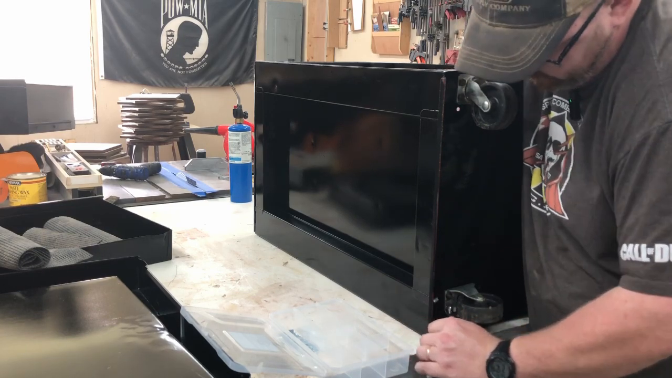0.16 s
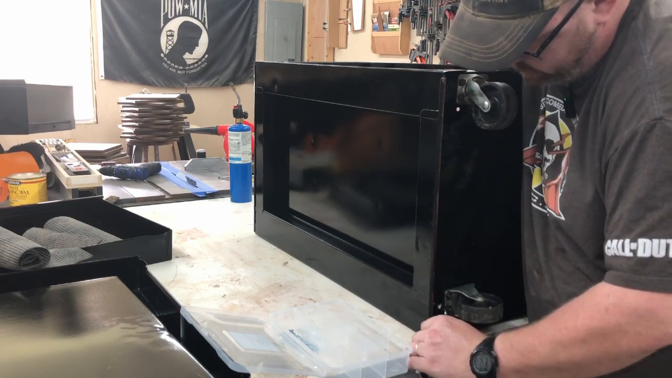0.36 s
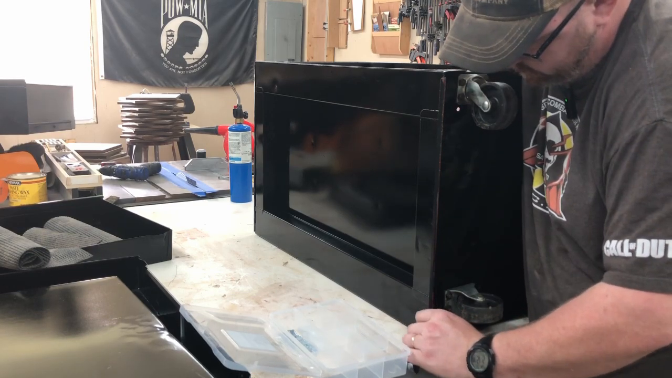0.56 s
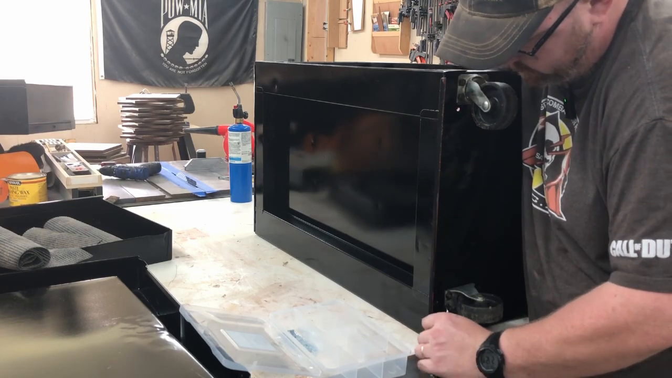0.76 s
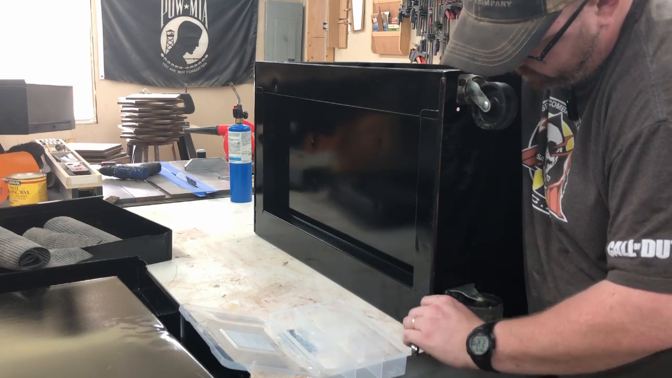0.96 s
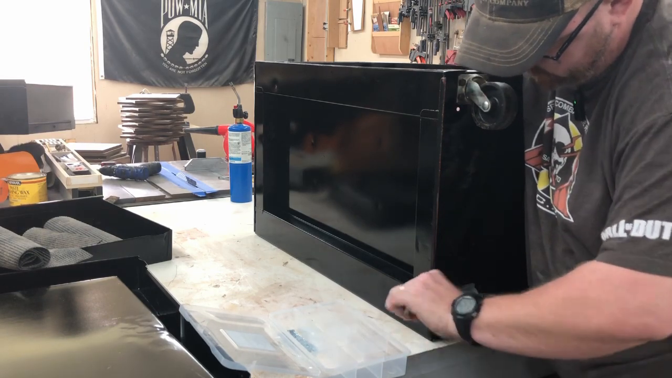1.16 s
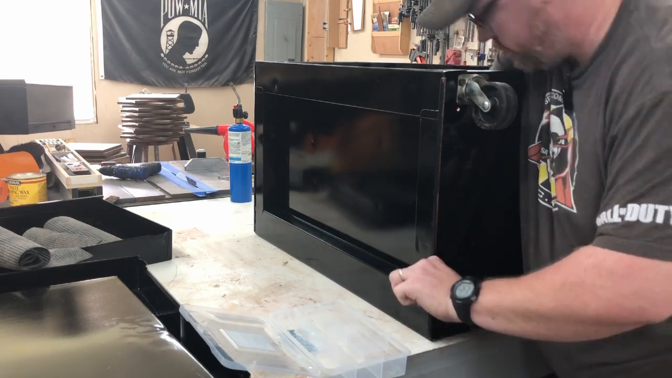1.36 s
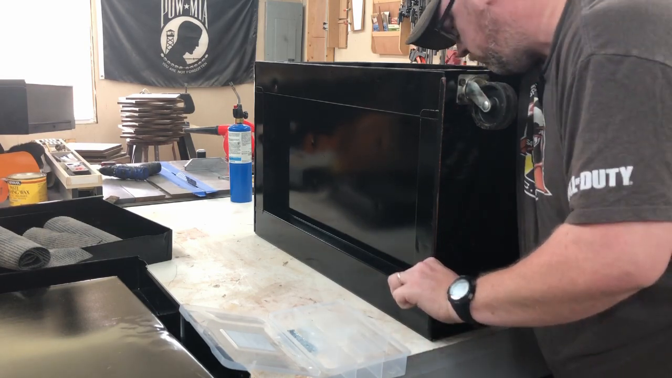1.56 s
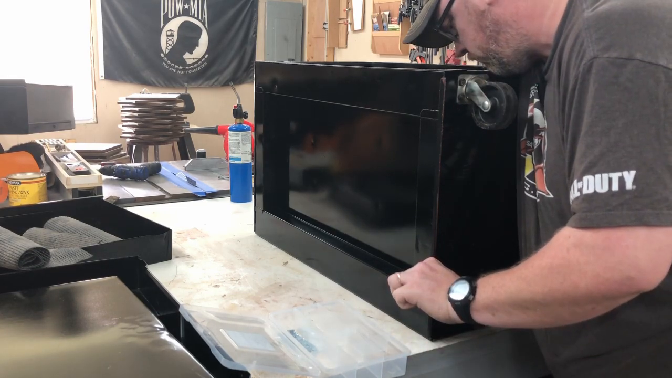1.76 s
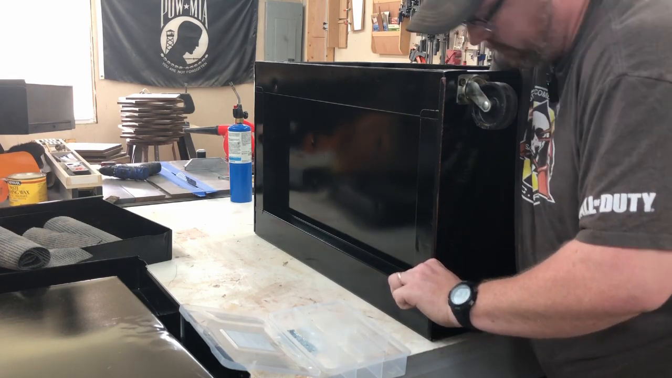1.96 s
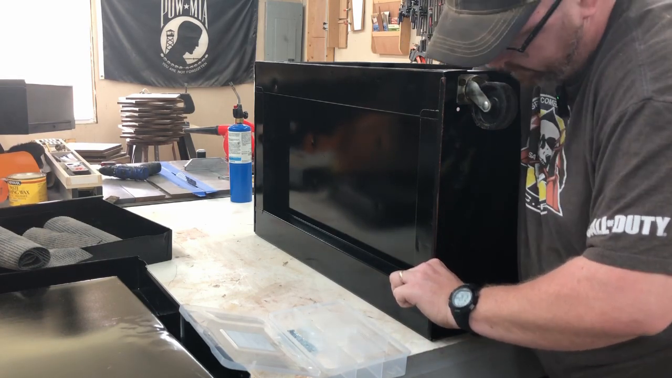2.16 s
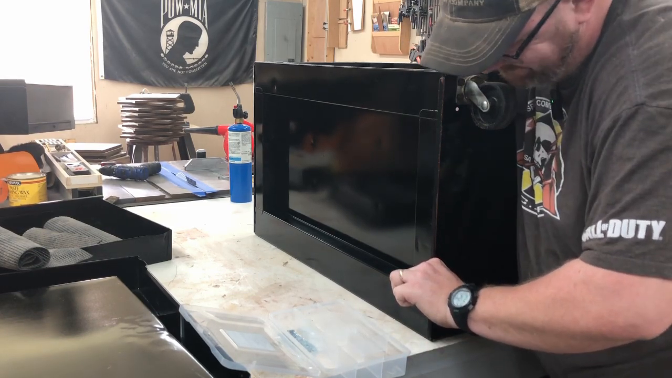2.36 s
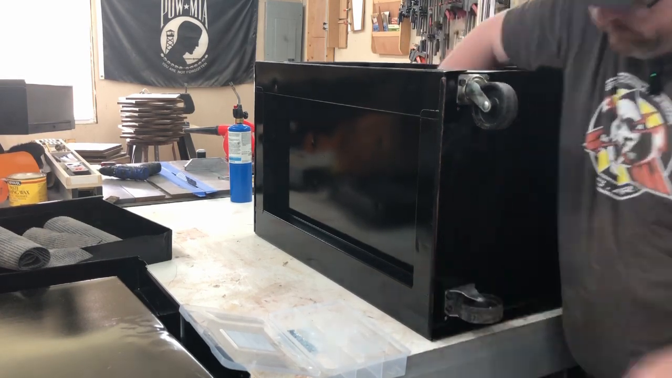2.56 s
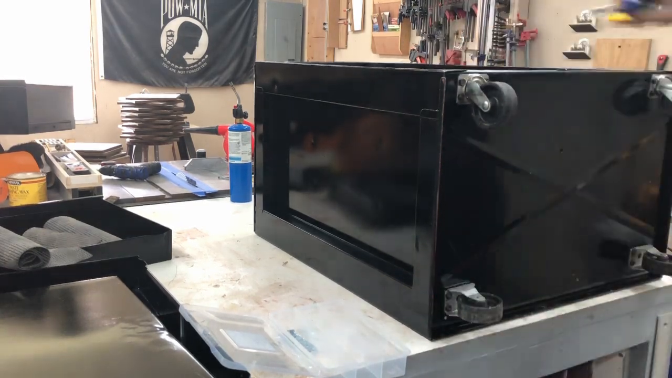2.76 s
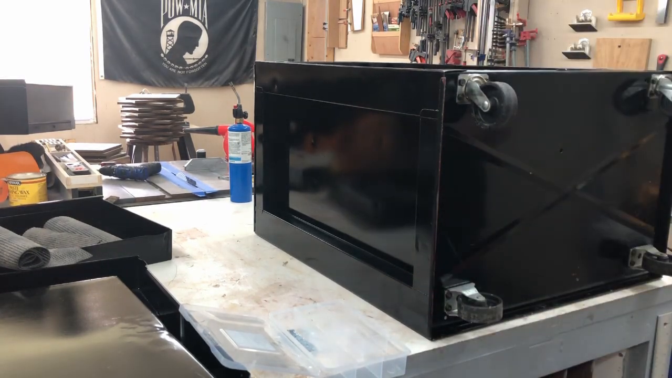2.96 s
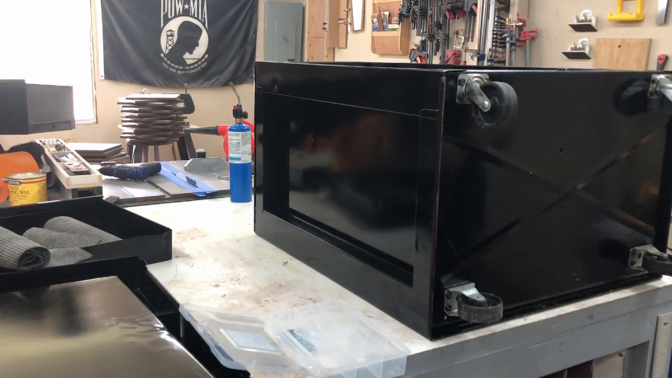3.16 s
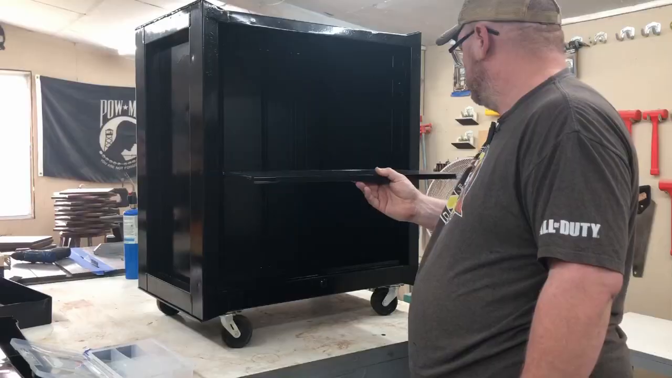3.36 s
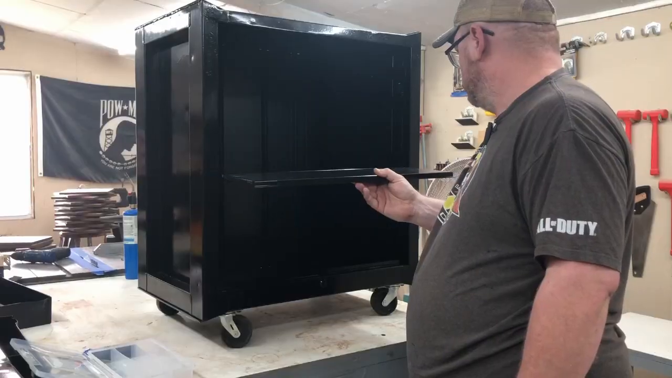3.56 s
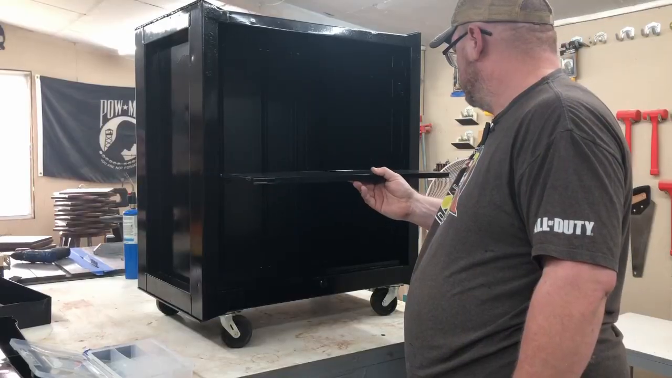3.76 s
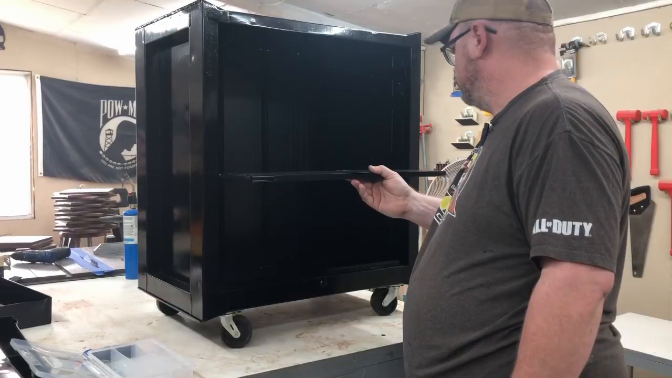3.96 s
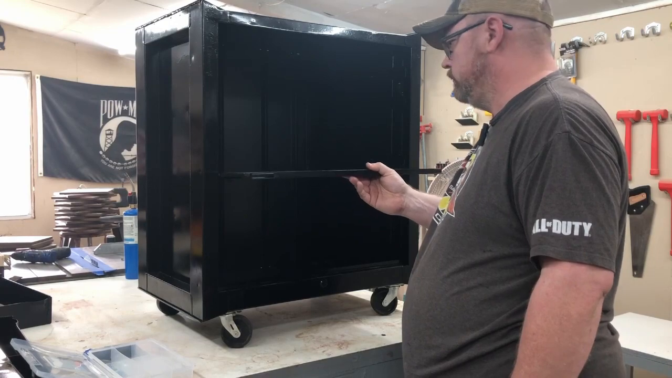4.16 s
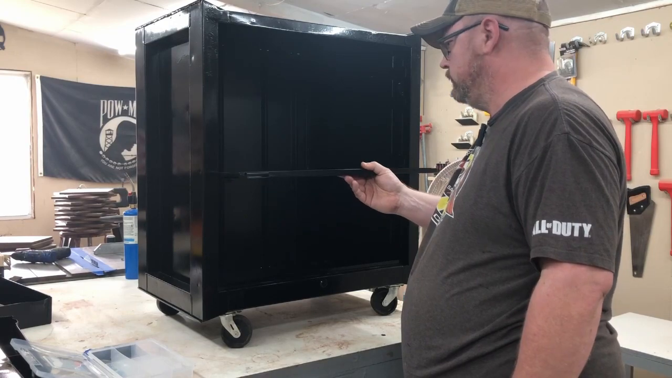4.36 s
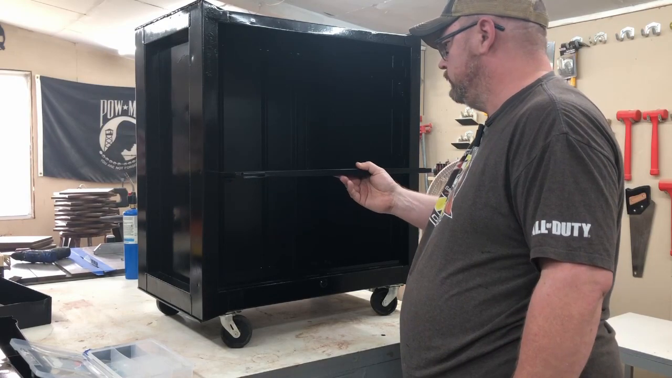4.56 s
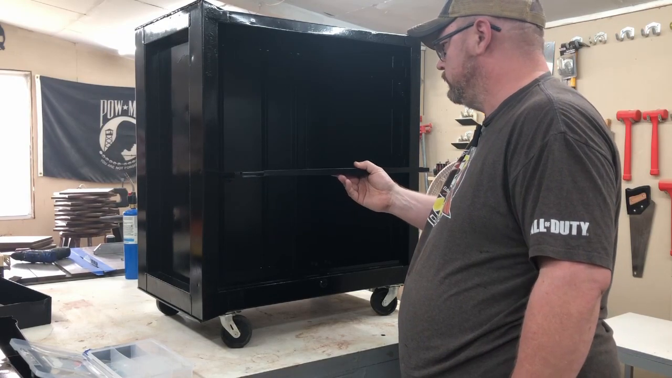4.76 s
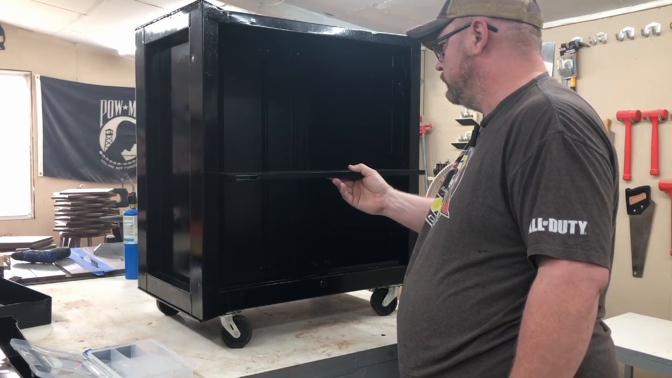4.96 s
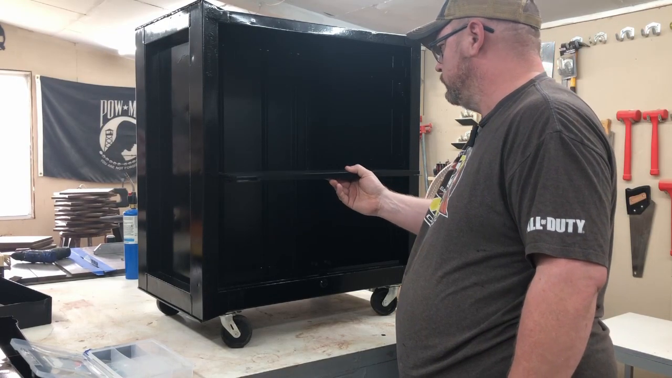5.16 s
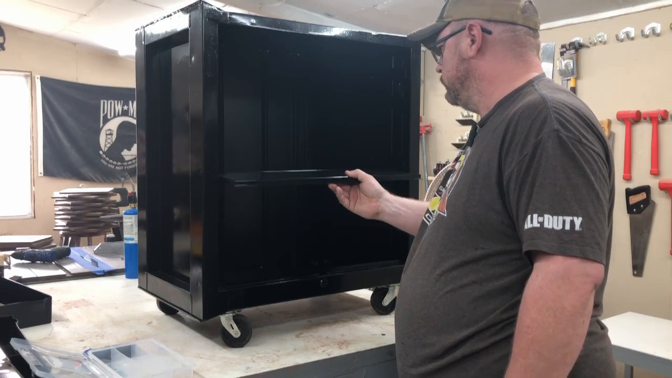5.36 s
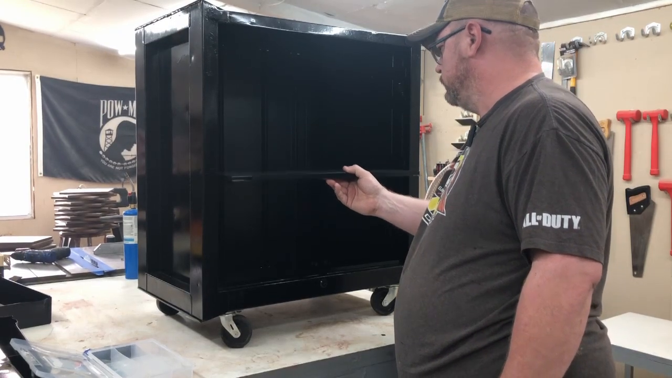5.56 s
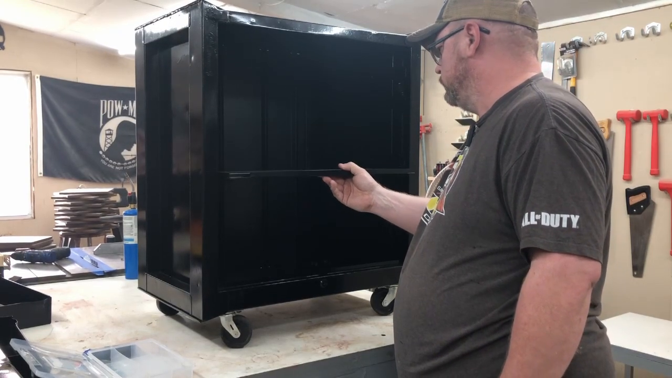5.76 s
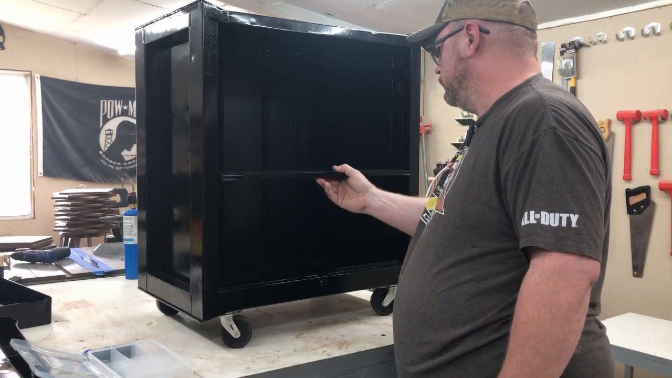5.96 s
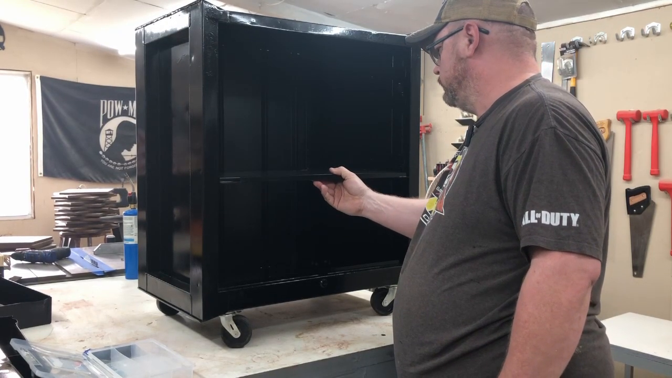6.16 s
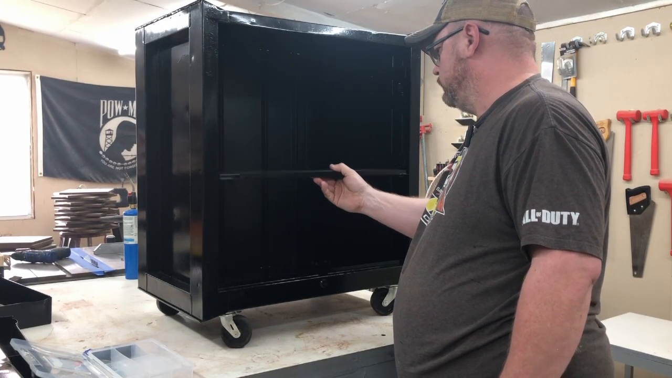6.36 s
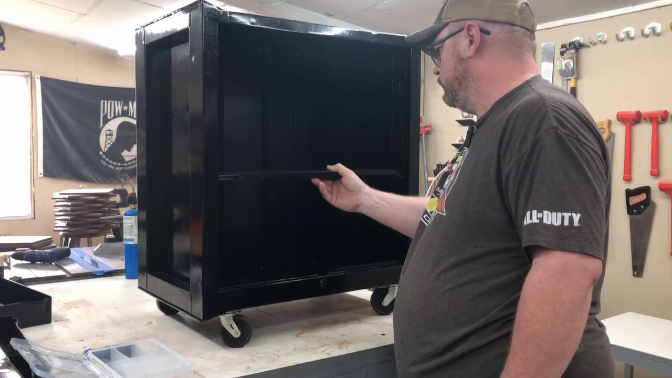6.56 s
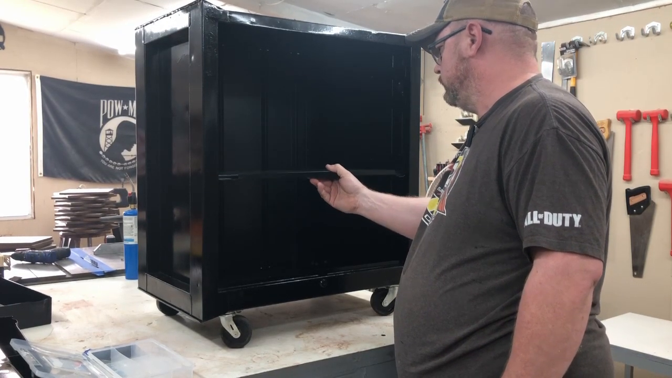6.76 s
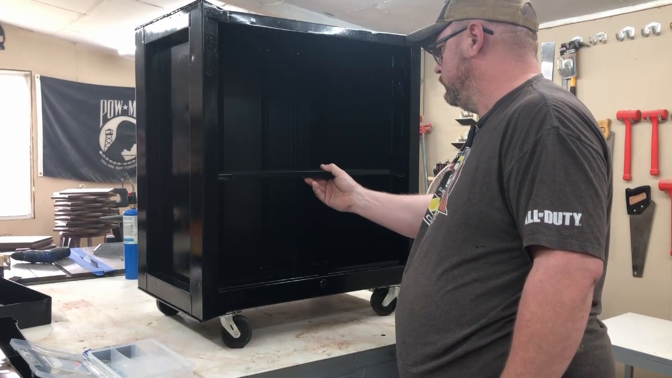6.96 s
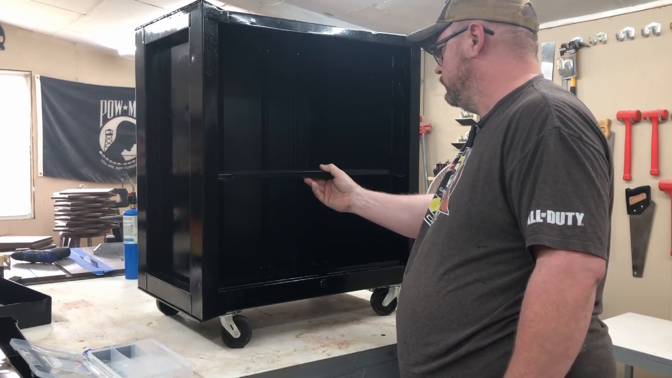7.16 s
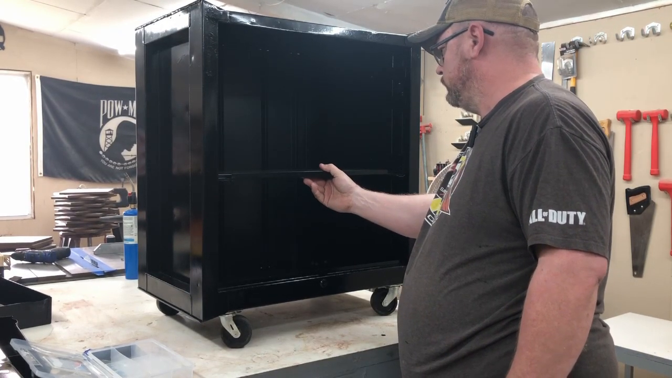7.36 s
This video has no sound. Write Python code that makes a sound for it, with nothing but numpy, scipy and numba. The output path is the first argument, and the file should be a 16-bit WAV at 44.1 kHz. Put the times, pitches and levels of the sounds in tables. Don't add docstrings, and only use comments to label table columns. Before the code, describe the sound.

Rapid bright steel ticks and taps, a tiny gap, then slower hollow bangs and a brief scrape as a metal shelf is pushed into a cabinet.

```python
import sys
import numpy as np
from scipy import signal
from scipy.fft import rfft, irfft
from scipy.io import wavfile
from scipy.ndimage import uniform_filter1d
from numba import njit

SR = 44100
rng = np.random.default_rng(int(sys.argv[2]) if len(sys.argv) > 2 else 0)


def digitize_waveform(pressure):
    field = np.atleast_2d(pressure).T
    bounded = np.clip(field, -1, 1)
    quanta = np.round(bounded * 32767).astype(np.int16)
    wavfile.write(sys.argv[1], SR, quanta)


def level_to_linear(level):
    exponent = np.asarray(level, float) / 20
    return 10 ** exponent


N = 326340
BASS_CUT_HZ = 220.5

# (frequency [Hz], level [dB])
GATE = [(300, -72.5), (1500, -76), (4000, -95.5), (12000, -109.5)]


def spanner():
    speed_up, ring_factor = 4.0, 0.6
    # (time [s], tool ring [dB], socket knock [dB], edge tick [dB])
    ticks = [(.417, -19, -32, -28), (.4369, -25.5, -45, -33), (.5287, -28, -28, -20),
             (.5347, -27, -32, -34), (.6141, -36, -34, -38.5), (.6385, -34, -34, -19),
             (.6856, -50, -53, -48.5), (.7438, -20.5, -26, -36), (.751, -23, -33, -21),
             (.7728, -38, -30, -28), (.7965, -29, -38, -28), (.8263, -45, -76, -43.5),
             (.878, -25, -36, -24), (.9117, -31, -31, -20), (.9175, -23, -30, -24), (.9478, -26, -38, -22),
             (.9663, -38, -54.5, -41.5), (.9697, -22.5, -28, -22.5), (.9868, -30, -34, -30)]
    # (time [s], tool ring [dB], socket knock [dB], edge tick [dB], contact if brief [ms])
    taps = [(0.078, -59, -50.5, -45), (0.1147, -80, -49.5, -50.5), (.1344, -82, -52, -32.5),
            (.209, -75, -48.5, -42), (.2874, -60, -77, -54), (.3007, -52, -60, -54),
            (0.319, -35.5, -77, -85), (0.3482, -55.5, -51.5, -41), (1.1473, -28, -30.5, -26.5),
            (1.247, -54, -66, -53), (1.283, -27, -29.5, -27), (1.3396, -45, -60, -47.5),
            (1.7139, -42, -46, -30, .15), (1.7204, -47, -48, -31, .15), (1.949, -55, -60, -50, .15),
            (2.1473, -33, -39, -37), (2.5266, -75, -78, -46)]
    # (time [s], tool ring [dB], socket knock [dB], edge tick [dB], contact [ms])
    slips = [
        (.517, -25, -37, -28, 4),
        (.524, -24, -34, -30, 2),
        (.619, -19, -26, -24, 3),
        (.734, -26, -26, -31, 2.5),
        (.762, -22, -29, -22, 3),
        (.865, -27, -33, -37, 4),
        (.874, -16, -27, -30, 1.5),
        (1.278, -45, -45, -50, 2),
        (.546, -38, -29, -45, 2),
        (.925, -34, -32, -36, 3),
    ]
    # (frequency [Hz], level per Hz [dB])
    tool_spectrum = [(290, -51), (500, -16), (952, -27), (1100, -11), (1410, -4), (2000, -8), (2600, -14),
                     (3700, -16), (4110, 1.5), (4900, 0), (6470, -11.5), (9060, -10), (12300, -21),
                     (14900, -24), (16500, -60)]
    # (frequency [Hz], level [dB], t60 [s])
    tool_modes = [(1440, -5, .07), (1800, -6, .05), (4250, 4, .06), (4530, 1, .06), (4850, 4, .05),
                  (6080, -6, .05), (7450, -9, .05), (9150, -12, .04)]
    # (time [s], tool ring [dB], wall knock [dB], edge tick [dB], contact if given [ms])
    clacks = [(1.0318, -32.5, -36, -55), (1.0347, -5.5, -24, -27, .33), (1.0448, -23.5, -53, -27.5),
              (1.56, -17, -13, -43), (1.666, -111, -26, -83, 1.5), (1.7931, -20.5, -20, -26),
              (1.8159, -21, -42, -35), (1.8217, -17, -23, -33), (1.8973, -22, -14.5, -26),
              (1.9981, -13, -15.5, -29, .33), (2.2352, -52, -53, -77), (2.4686, -47.5, -26.5, -53),
              (2.4872, -53, -32, -67), (2.7864, -50.5, -51, -55)]
    # (frequency [Hz], level per Hz [dB])
    wall_spectrum = [(290, -63), (500, -2), (764, -24), (1070, -1.5), (2040, 4.5), (2260, -6),
                     (3300, -11.5), (3600, -14), (4110, -10), (7380, -24), (15100, -22.5), (16500, -44)]
    # (frequency [Hz], level [dB], t60 [s])
    wall_modes = [(1082.5, 16, 0.13), (1336, 4, 0.1), (2070, 2, .05), (2380, 0, .04), (3040, -6, .06),
                  (3330, -2, .04), (4030, -3, .04), (4580, -7, .04)]
    tool = steel(sorted(ticks + taps + slips), tool_spectrum, tool_modes, speed_up, ring_factor, thud_db=-4.5)
    wall = steel(clacks, wall_spectrum, wall_modes, speed_up, ring_factor, thud_db=3)
    return tool + wall


def steel(blows, spectrum, named, speed, ring_factor, thud_db):
    # (frequency [Hz], t60 [s])
    steel_t60 = [(700, 0.28), (1850, 0.09), (4880, 0.073), (12900, 0.068)]
    usual_ms, usual_crack_db, crack_loss_db = 0.4, -16, 7
    glance = 0.067
    out, thud = np.zeros(N), np.zeros(N)
    hz, db, t60 = body(spectrum, named, steel_t60, 17, [], count=420)
    gate = level_to_linear(along(GATE, hz / speed) - 16.5)
    crack_t60 = np.full(len(hz), 0.008)
    in_step = np.pi / 2 - 2 * np.pi * hz * 0.001
    for s, mid_db, low_db, high_db, *contact in blows:
        ms = max(contact[0], 0.1) if contact else usual_ms
        crack_change_db = -crack_loss_db * np.log2(ms / usual_ms)
        crack_db = usual_crack_db + crack_change_db
        blow_db = max(mid_db, low_db)
        length = ring_factor * level_to_linear(glance * np.clip(-23.5 - blow_db, 0, 15))
        bands_db = np.array([low_db, mid_db, high_db])
        size = struck(hz, db, [900, 2500, 7000, 16000], bands_db, 3.3, 6.5, 4500)
        start, phase = int(s * SR), 2 * np.pi * rng.random(len(hz))
        ring_modes(out, start, hz, size * level_to_linear(-13.5), t60 * length, phase, ms / 1000, gate)
        ring_modes(out, start, hz, size * level_to_linear(crack_db), crack_t60, in_step, 0.0003, gate / 30)
        thud_size = level_to_linear(min(high_db, blow_db + 8) + thud_db + min(crack_change_db, 0))
        thud[start + SR // 1000] += thud_size * np.sign(phase[0] - np.pi)
    return bass_cut(out, BASS_CUT_HZ * speed) + soft_click(thud)


def splice_clicks():
    # (time [s], level [dB])
    splices = [(.418, -29), (.531, -20), (0.6394, -20), (.6866, -27.5), (0.7463, -10.5), (0.754, -16),
               (.7982, -10.5), (.878, -12.5), (0.9112, -13), (0.9158, -18.5), (0.97, -19), (1.1482, -11.5),
               (1.715, -18), (2.1485, -28)]
    joins = np.zeros(N)
    for s, db in splices:
        joins[int(s * SR)] = level_to_linear(db)
    return soft_click(joins)


def shelf():
    # (time [s], floor boom [dB], panel ring [dB], rail clank [dB], contact rise [ms])
    nudges = [(3.541, -41, -26.5, -34, 1.6), (3.551, -32.5, -40, -30, 5), (3.619, -30, -38, -37.5, 0.84),
              (3.781, -31.5, -30.5, -43, 3.7), (3.923, -51, -59, -70, 3.5), (4.701, -36.5, -51.5, -70, 7.5),
              (4.738, -29.5, -26, -39, 9.4), (4.797, -23.5, -40, -83.5, 2.2), (4.867, -36.5, -75, -74, 1.6),
              (5.13, -29.5, -59, -65, 0.68), (5.213, -51, -50.5, -44.5, 2.1),
              (5.261, -29.5, -50.5, -46.5, 3.7), (5.337, -47.5, -51, -40.5, 3.8),
              (5.853, -21, -53, -55, 0.63), (7.052, -27.5, -51, -43, 4.2), (7.066, -37, -52, -36, 3.6),
              (7.108, -39, -79, -39, 3.6)]
    # (time [s], floor boom [dB], panel ring [dB], rail clank [dB], contact rise [ms])
    bangs = [(5.392, -25.5, -38, -10, 7.1), (5.404, -16.5, -26.5, -18, 8.8), (5.406, -40, -25, -15.5, 3.6),
             (5.446, -26.5, -28, -20, 10.5), (5.493, -22, -40.5, -22.5, 2.7), (6.154, -39.5, -52, -62, 3.4),
             (6.174, -29.5, -44, -37.5, 9.1), (6.2, -39, -45.5, -37, 2.2), (6.22, -21, -28.5, -14.5, 2.9),
             (6.242, -51, -27.5, -16, 4), (6.266, -23, -27, -19, 0.98), (6.309, -30, -34, -49, 3.3),
             (6.535, -37, -37, -31, 9), (6.551, -27.5, -26.5, -13.5, 4), (6.578, -27, -29, -19, 3),
             (6.701, -16, -27, -18, 2.9), (6.719, -24, -35, -42, 3.7), (6.759, -28.5, -32, -62, 2.7)]
    # (time [s], level [dB])
    scrapes = [
        (4.799, -61),
        (5.337, -45.5),
        (5.403, -22),
        (7.062, -51.5),
        (7.106, -50),
    ]
    # (frequency [Hz], level per Hz [dB])
    panel_spectrum = [(59, -71), (100, 1), (156, -20), (266, -12), (406, -12.5), (442, -4.5), (547, -4),
                      (836, -3.5), (1870, -27.5), (2040, -34.5), (3250, -29.5), (4570, -33), (8280, -29.5),
                      (12900, -32), (16000, -59)]
    # (frequency [Hz], level [dB], t60 [s])
    panel_modes = [(303.5, -15, 0.17), (447.7, -5, 0.28), (524.4, -12.5, 0.44), (617, -24, 0.3),
                   (703, -20.5, 0.7), (830, 2.5, 0.23), (930, -1, 0.11), (950, -18.5, 0.1),
                   (1031, -5, 0.12), (1290, -23, 0.65), (1420, -15.5, 0.21), (1820, -27, 0.2)]
    # (frequency [Hz], level [dB], t60 [s])
    sheet_modes = [(1244, -18, .25), (1674, -20, .15), (2165, -33, .2), (2315, -34, .22), (2487, -33, .18),
                   (2900, -31, .16), (3009, -30, .16), (3260, -29, .17), (3520, -33, .17), (3704, -33, .17),
                   (5490, -30, .25)]
    # (centre [Hz], width [Hz], gain [dB])
    panel_peaks = [(3200, 200, 4.5), (5830, 1000, 6.5), (8170, 700, 4), (10500, 700, 1), (11800, 630, 1.5)]
    # (frequency [Hz], t60 [s])
    panel_t60 = [(150, 0.52), (400, 0.46), (1040, 0.3), (2760, 0.23), (7280, 0.17), (13000, .11)]
    out = np.zeros(N)
    hz, db, t60 = body(panel_spectrum, panel_modes + sheet_modes, panel_t60, 18.25, panel_peaks, count=1000)
    gate = level_to_linear(along(GATE, hz))
    blows = []
    for s, boom_db, ring_db, clank_db, rise_ms in sorted(nudges + bangs):
        sizzle_db = -41 + 1.98 * (clank_db + 17.5)
        blows.append((s, boom_db, ring_db, clank_db, sizzle_db, rise_ms))
    for s, scrape_db in scrapes:
        blows.append((s, -99, -99, scrape_db - 12, scrape_db, 2.6))
    for s, *bands_db, rise_ms in blows:
        size = struck(hz, db, [200, 620, 1150, 4500, 14000], np.array(bands_db), 2.8, 2.5, 2800)
        jitter = 1 + 0.004 * rng.standard_normal(len(hz))
        phase = 2 * np.pi * rng.random(len(hz))
        rise_s = max(rise_ms, 0.2) / 1400
        ring_modes(out, int(s * SR), hz * jitter, size * level_to_linear(-4.5), t60, phase, rise_s, gate)
    return bass_cut(out, BASS_CUT_HZ)


def body(spectrum, named, t60s, named_db, peaks, count):
    lo, hi = np.sqrt(spectrum[1][0]), np.sqrt(spectrum[-1][0])
    root = lo + (hi - lo) * (np.arange(count) + rng.random(count)) / count
    hz = root ** 2
    spacing_hz = 2 * root * (hi - lo) / count
    db = along(spectrum, hz) + 10 * np.log10(spacing_hz)
    db += sum(gain * np.exp(-0.5 * ((hz - f) / (width / 2)) ** 2) for f, width, gain in peaks)
    t60 = along(t60s, hz) * np.exp(0.036 * rng.standard_normal(count))
    named_hz, level_db, named_t60 = np.transpose(named)
    named_t60 = np.clip(named_t60, 0, 1.4 * along(t60s, named_hz))
    return np.r_[hz, named_hz], np.r_[db, level_db + named_db], np.r_[t60, named_t60]


def struck(hz, db, edges_hz, bands_db, cluster_db, scatter_db, sparse_hz):
    power = []
    for low, high in zip(edges_hz, edges_hz[1:]):
        inside = (hz >= low) & (hz < high)
        power.append(np.sum(level_to_linear(2 * db[inside])) / 2)
    middle_hz = np.sqrt(np.multiply(edges_hz[:-1], edges_hz[1:]))
    share_db = along(np.c_[middle_hz, bands_db - 10 * np.log10(power)], hz)
    cluster = along(np.c_[np.geomspace(100, 16000, num=36), rng.standard_normal(36)], hz)
    single = rng.standard_normal(len(hz)) * np.clip(sparse_hz / hz, 0.15, 1)
    return level_to_linear(db + share_db + cluster_db * cluster + scatter_db * single)


@njit
def ring_modes(out, start, hz, size, t60, phase, rise_s, gate):
    swell = np.exp(-1 / (rise_s * SR))
    for m in range(len(hz)):
        level, fade = size[m], np.exp(-np.log(1000) / (t60[m] * SR))
        spin, turn = np.exp(1j * phase[m]), np.exp(2j * np.pi * hz[m] / SR)
        wait, i = 1.0, start
        while level > gate[m] and i < len(out):
            wait *= swell
            out[i] += max(level * (1 - wait) ** 2 - gate[m], 0.0) * spin.imag
            level *= fade
            spin *= turn
            i += 1


def lone_rings():
    # (time [s], length [s], frequency [Hz], level [dB])
    rings = [(3.545, .035, 813, -44.5), (3.626, .041, 1637, -43.5), (3.66, .091, 540, -50),
             (3.781, .029, 878, -25), (3.917, .075, 444, -56), (4.734, 0.016, 805, -18),
             (4.863, .073, 598, -34), (4.993, .14, 830, -48.5), (5.158, .066, 1390, -57),
             (5.211, .14, 534, -42.5), (5.453, .13, 2260, -45), (5.57, .071, 512, -43),
             (5.262, .03, 500, -32), (5.74, .09, 1240, -58), (5.85, 0.052, 482, -22),
             (5.865, .055, 830, -47), (5.9, .08, 330, -40), (6.055, .03, 1600, -56),
             (6.076, .15, 1815, -54), (6.138, .056, 497, -43.5), (6.171, .057, 1420, -43.5),
             (6.365, .15, 604, -45), (6.827, .15, 447, -48), (6.938, .05, 1443, -47),
             (7.04, .078, 1425, -44.5), (7.073, .056, 1700, -56.5)]
    # (time [s], length [s], frequency [Hz], level [dB])
    push_rings = [(5.4, .16, 447, -27), (5.398, .045, 1820, -28), (5.4, .04, 2490, -30),
                  (5.392, .05, 3260, -34), (5.42, .11, 829, -33), (5.44, .07, 1055, -35),
                  (6.22, .05, 490, -28), (6.265, .1, 614, -29), (6.262, .04, 960, -30),
                  (6.23, .06, 3300, -36), (6.548, .05, 490, -28), (6.55, .04, 820, -30),
                  (6.55, .07, 1400, -28), (6.555, .06, 1650, -31), (6.55, .04, 3270, -34),
                  (6.575, .1, 2170, -42), (6.705, .11, 440, -26), (6.7, .035, 815, -27),
                  (6.72, .1, 612, -33), (6.82, .1, 612, -50)]
    return bursts([(*row, 24) for row in rings + push_rings])


def rattles():
    # (time [s], length [s], frequency [Hz], level [dB], width [Hz])
    parts = [(0.21, 0.0048, 3070, -47.5, 98), (1.034, 0.043, 2896, -26.5, 1200),
             (1.113, .017, 2190, -45.5, 150), (2.249, 0.037, 1080, -55, 250),
             (2.311, 0.022, 3060, -57, 350), (2.318, 0.062, 1550, -62, 385), (2.462, .03, 2210, -50, 1150),
             (2.795, .036, 950, -50, 138), (2.789, 0.044, 2904, -55.5, 1020),
             (3.535, 0.03, 2770, -44.5, 449), (2.481, .038, 1600, -36, 350), (4.935, .11, 1700, -59, 120),
             (4.735, .045, 5500, -78, 500), (5.24, .055, 5400, -77, 200), (6.29, .11, 5550, -70, 350),
             (3.615, .045, 2750, -56, 150), (4.735, .04, 1800, -48, 120), (.335, .085, 350, -80, 900),
             (1.425, .03, 200, -86, 500), (2.15, .07, 300, -82, 900), (2.62, .03, 300, -85, 700)]
    return bursts(parts)


def rustles():
    # (time [s], length [s], frequency [Hz], level [dB])
    wide_bursts = [(1.423, .034, 13700, -63.5), (1.517, .017, 12600, -57), (1.712, .017, 13200, -38),
                   (2.027, .038, 13800, -63), (2.465, .0096, 11850, -47), (2.526, .021, 11000, -56.5),
                   (2.565, .1, 13600, -66), (2.71, .066, 13800, -67.5), (3.182, .027, 14000, -67),
                   (3.359, .052, 7200, -72), (4.206, .075, 8560, -74.5), (5.591, .037, 13100, -67),
                   (6.57, .115, 13200, -71), (2.005, .02, 13800, -60), (6.571, .14, 3350, -54)]
    return bursts([(*row, 0.088 * row[2]) for row in wide_bursts])


def bursts(rows):
    out = np.zeros(N)
    for s, length_s, hz, db, width_hz in rows:
        fall_db = 0.8 * max(db + 57, 0) * min(length_s / 0.049, 1)
        t = np.arange(int(length_s * SR)) / SR
        b, a = signal.butter(2, width_hz / SR)
        rim = signal.lfilter(b, a, rng.standard_normal((2, 9000)))[:, -len(t):]
        rim = (rim[0] + 1j * rim[1]) * np.sqrt(SR / width_hz / 2)
        core = np.exp(-width_hz / 55)
        edge = np.clip(np.minimum(t, length_s - t) / min(0.014, length_s / 3), 0, 1)
        hold = edge * level_to_linear(db - fall_db * t / length_s)
        tone = (core + (1 - core) * rim) * np.exp(2j * np.pi * hz * t)
        out[int(s * SR):][:len(t)] += hold * np.imag(tone)
    return out


def rubbing():
    # (time [s], level [dB])
    rub_levels = [(3.36, -67), (3.42, -77.5), (3.46, -96), (3.9, -101), (3.95, -82.5), (4.11, -78),
                  (4.18, -70), (4.3, -79.5), (4.79, -85.5), (5.71, -90), (6.05, -81.5), (6.79, -103),
                  (6.95, -82), (7.14, -82.5), (7.4, -113.5)]
    spectrum = [(4000, -32.5), (6500, -24.5), (9500, -6), (11500, 8.5), (13500, 8.5), (14600, -33.5)]
    rub_db = np.interp(np.arange(N) / SR, *np.transpose(rub_levels))
    return level_to_linear(rub_db) * hiss(spectrum, 0, 2.75)


def fast_hiss():
    # (frequency [Hz], level per Hz [dB])
    fast_spectrum = [(60, -58), (290, -60), (600, -48), (994, -9), (1240, -10.5), (1290, -6), (1390, -21.5),
                     (1480, 0), (1590, -11.5), (1760, -7), (1890, -9.5), (3660, -10), (12800, -26.5),
                     (13300, -45), (16500, -70)]
    top_flutter = hiss([(12500, -50), (13100, 0), (15600, -6), (15900, -50)], -89, 5)
    return hiss(fast_spectrum, -66.5, 0.93) + top_flutter


def shop_hiss():
    # (frequency [Hz], level per Hz [dB])
    shop_spectrum = [(59, -74.5), (100, -40), (150, -44.5), (220, -10), (371, -1), (408, -4), (1180, -7),
                     (1320, -5), (2270, -15), (3470, -18), (4280, -31), (7350, -33), (8090, -34.5),
                     (9440, -39), (10000, -36), (13000, -69.5), (22000, -120)]
    return hiss(shop_spectrum, -64.5, 0.65)


def hiss(spectrum, db, flicker_db):
    colour = level_to_linear(along(spectrum, np.fft.rfftfreq(N, 1 / SR)))
    noise = irfft(rfft(rng.standard_normal(N)) * colour, N)
    span = SR // 20
    waver = uniform_filter1d(rng.standard_normal(N), span) * np.sqrt(span)
    return noise * level_to_linear(db + flicker_db * waver) / np.std(noise)


def along(table, hz):
    f, v = np.transpose(table)
    return np.interp(np.log(hz + 1), np.log(f), v)


def bass_cut(x, hz):
    return signal.sosfilt(signal.butter(7, hz, "high", fs=SR, output="sos"), x)


def soft_click(impulses):
    return signal.lfilter([0.1], [1, -0.9], impulses)


def scene():
    cut_s, resume_s = 3.3385, 3.359
    t = np.arange(N) / SR
    before = np.clip((cut_s - t) / 0.0005, 0, 1)
    after = np.clip((t - resume_s) / 0.00077, 0, 1)
    fast = before * (spanner() + splice_clicks() + fast_hiss())
    slow = after * (shelf() + rubbing() + shop_hiss())
    left = 2 * (fast + slow + lone_rings() + rattles() + rustles())
    return np.array([left, np.zeros(N)])


def band_limit(x):
    return signal.sosfilt(signal.butter(12, 17030, fs=SR, output="sos"), x)


def record(dry):
    return band_limit(dry)


dry = scene()
out = record(dry)
digitize_waveform(out)
```